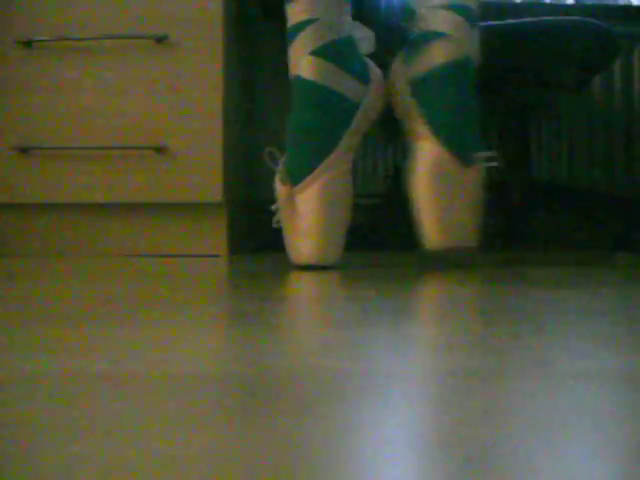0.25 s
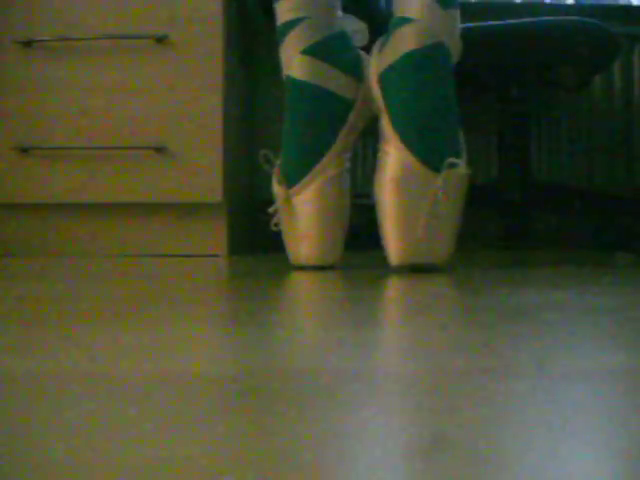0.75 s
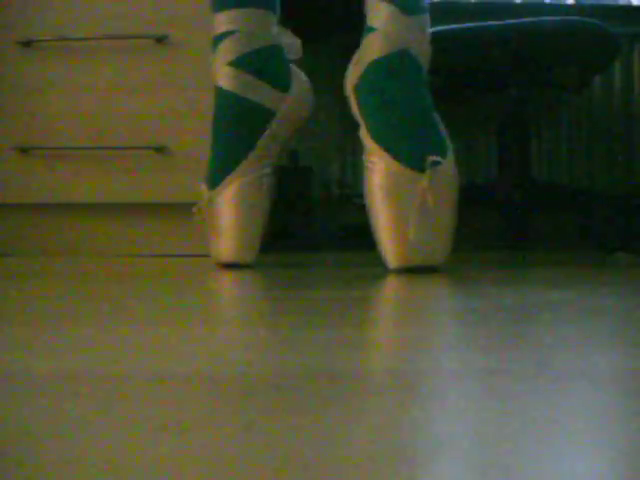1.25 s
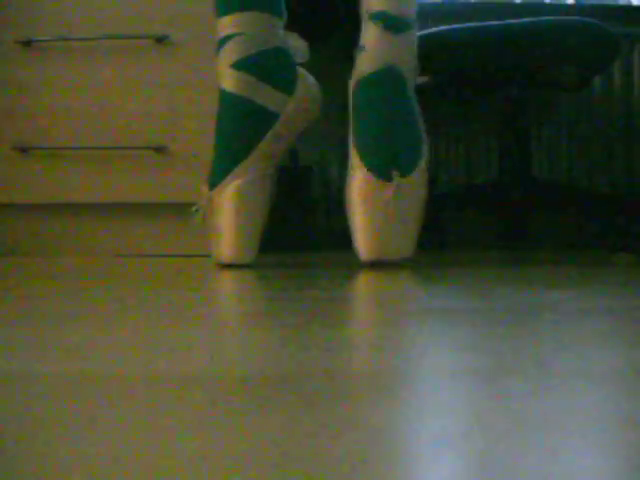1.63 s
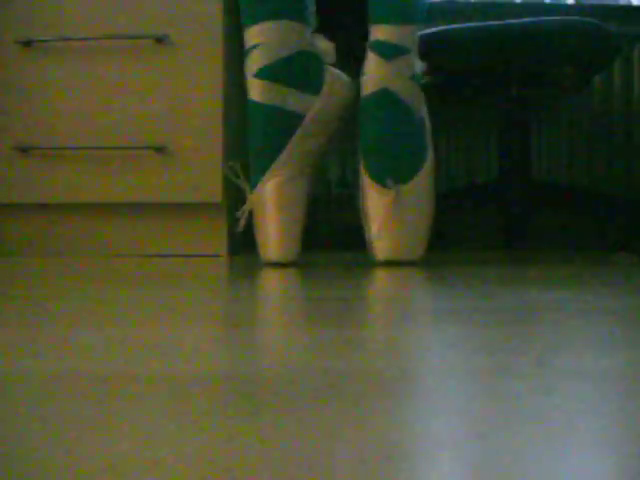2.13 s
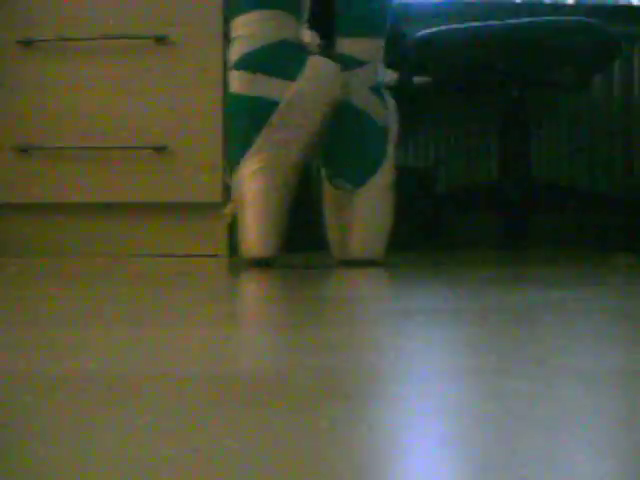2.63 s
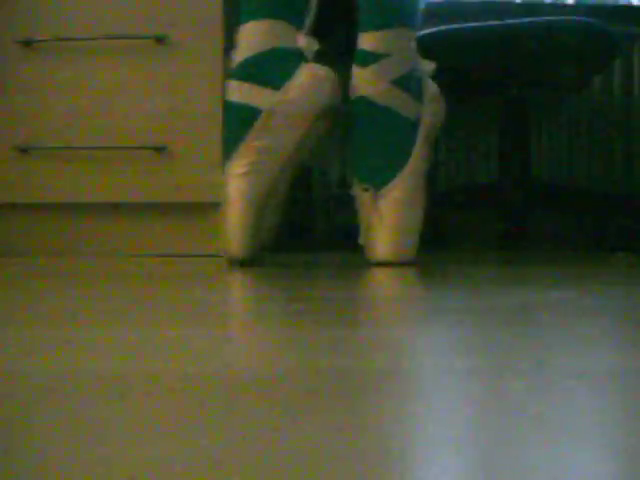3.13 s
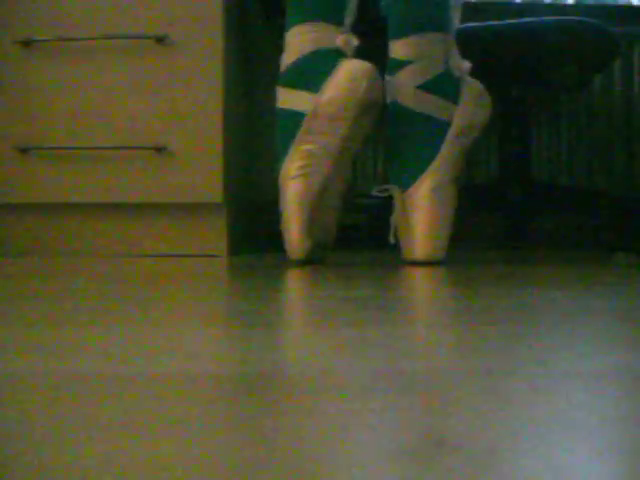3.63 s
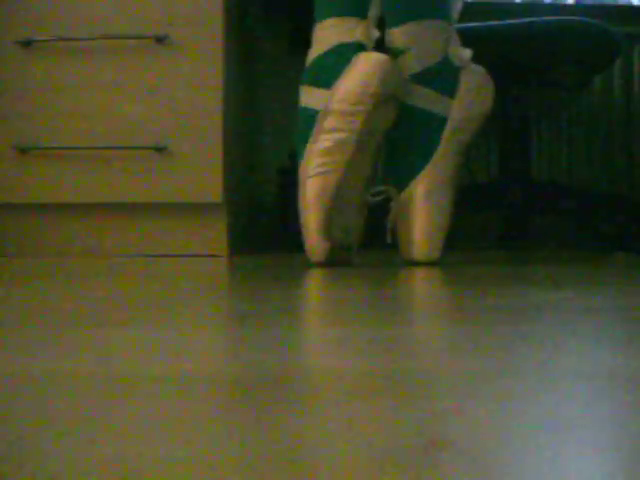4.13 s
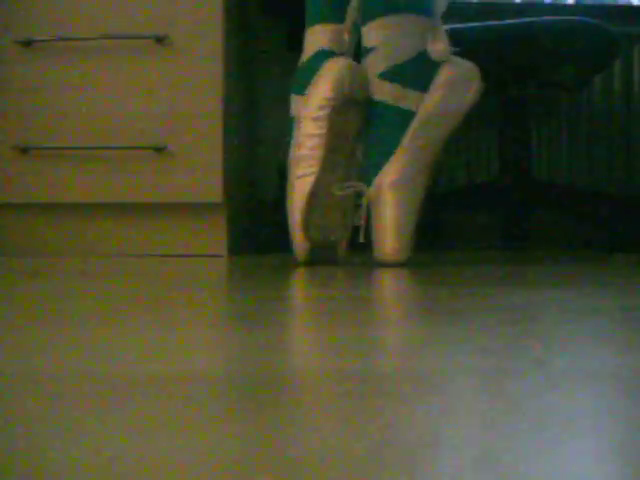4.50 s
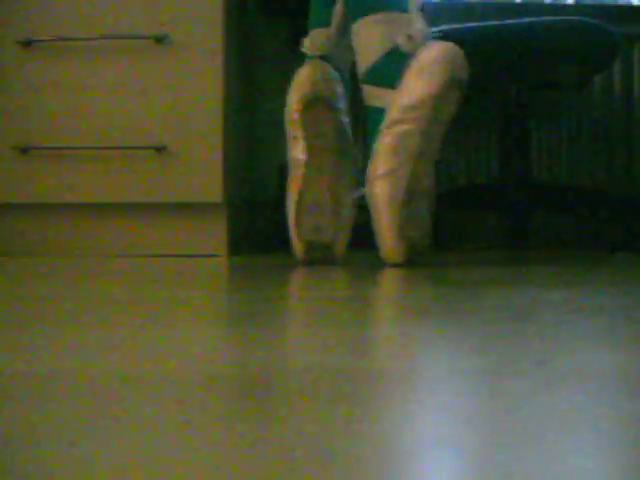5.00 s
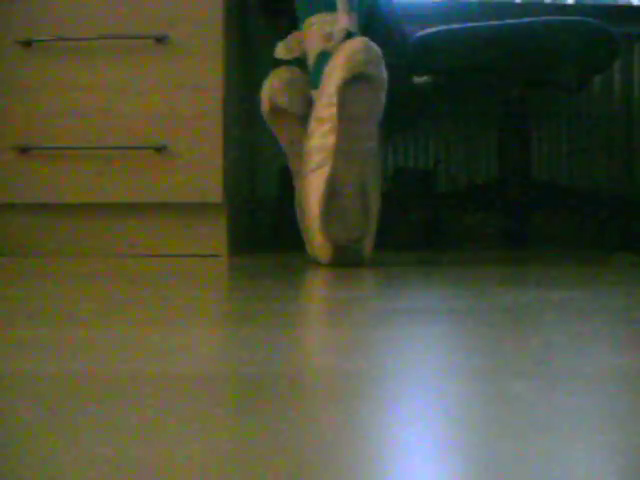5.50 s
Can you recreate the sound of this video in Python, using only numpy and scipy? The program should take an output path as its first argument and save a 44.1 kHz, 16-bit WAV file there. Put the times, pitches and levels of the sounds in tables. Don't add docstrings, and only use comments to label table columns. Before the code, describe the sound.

A coarse low electrical buzz runs throughout while stiff shoe tips tap and clonk on wood close by, with faint satin rubs between.

```python
import sys
import numpy as np
from scipy import signal
from scipy.fft import rfft, irfft, next_fast_len
from scipy.io import wavfile
from scipy.ndimage import map_coordinates

SR = 44100
rng = np.random.default_rng(int(sys.argv[2]) if len(sys.argv) > 2 else 0)


def attenuation_scalar(level_db):
    decades = np.asarray(level_db, float) / 20
    return 10 ** decades


def store_wav(level_fs):
    pcm = np.round(np.clip(np.atleast_2d(level_fs), -1, 1) * 32767)
    wavfile.write(sys.argv[1], SR, pcm.T.astype(np.int16))


N = 254016

# (time [s], blow level [dB], toe box pitch [Hz], floor thud level [dB], crack level [dB])
TOE_BLOWS = [(.621, 1, 221, -2, -19), (1.188, 4, 404, -6.5, -15), (1.6254, 4.5, 325.3, -6.5, -18.5),
             (1.871, 4.5, 601.4, -11.5, -22.5), (2.051, -11, 240, -11, -35), (2.086, -2, 464, -4, -24.5),
             (2.285, -3, 231, -1.5, -25.5), (2.510, 10, 585, -10, -21), (2.717, 6, 639.5, -13.5, -27.5),
             (3.196, 6.5, 685.6, -12, -20), (3.4228, -6.5, 327.4, 0.5, -35.5), (3.63, 7.5, 743, -15.5, -25),
             (3.944, -11, 765, -20.5, -10), (4.044, 13.5, 625, -9, -19.5), (4.256, -3, 267.5, -3.5, -30),
             (4.448, 2, 578, -7, -35.5), (4.711, 7, 501.3, -4, -13.5), (4.908, 12, 594, -12.5, -25),
             (5.180, -3, 290, 1.5, -19.5)]
# (frequency [Hz], density [dB per Hz])
SATIN_SPECTRUM = [(600, -21), (1300, -7.5), (2000, 6.5), (2700, 5.5), (3400, 3.5), (4200, -30)]


def unit(x):
    return x / np.sqrt(np.mean(x ** 2) + 1e-20)


def along(points, hz):
    f, v = np.transpose(points)
    return np.interp(np.log(hz + 1), np.log(f + 1), v)


def noise(spectrum, n):
    m = next_fast_len(n)
    white = rfft(rng.standard_normal(m))
    shape = attenuation_scalar(along(spectrum, np.fft.rfftfreq(m, 1 / SR)))
    return unit(irfft(white * shape, m)[:n])


def wobble(rate):
    knots = rng.standard_normal(int(N * rate / SR) + 4)
    return map_coordinates(knots, [np.arange(N) * rate / SR])


def add(track, s, sound):
    part = track[round(s * SR):][:len(sound)]
    part += sound[:len(part)]


def hiss():
    # (frequency [Hz], density [dB per Hz])
    hiss_spectrum = [(20, -17.5), (60, -5.5), (110, -9.5), (200, -14.5), (300, -5.5), (420, -10), (520, -5),
                     (700, -12), (880, -10), (1300, -18), (1930, -28), (2570, -23.5), (3440, -32.5),
                     (4300, -34.5)]
    t = np.arange(N) / SR
    high_whine = attenuation_scalar(-43.0) * np.sin(2 * np.pi * 2498 * t + 1.2 * wobble(2))
    low_whine = attenuation_scalar(-37.5) * np.sin(2 * np.pi * 1182 * t + 1.4 * wobble(8))
    return attenuation_scalar(-21 + 0.94 * wobble(13)) * noise(hiss_spectrum, N) + high_whine + low_whine


def bump(width_ms):
    ms = np.arange(SR // 20) * 1000 / SR
    x = ms / (2 * width_ms)
    return (x * np.exp(1 - x)) ** 2


def spikes(times, sizes, width_ms, rebound):
    train = np.bincount(np.round(times * SR).astype(int), sizes, N + SR)[:N]
    pulse = bump(width_ms) - rebound * bump(1.12)
    return signal.fftconvolve(train, pulse)[:N]


def buzz():
    # (delay [ms], size [ratio], width [ms], rebound [share])
    switchings = [
        (.42, -.77, .36, .36),
        (18.1, .56, .33, .36),
        (23.1, .25, .33, .2),
        (29.55, -.3, .16, 0),
        (29.8, .2, .4, .45),
    ]
    buzz_hz = 24.5858
    t = np.arange(N) / SR
    starts = np.arange(int(N / SR * buzz_hz) + 1) / buzz_hz
    steady = np.zeros(N)
    for ms, size, width_ms, rebound in switchings:
        sizes = size * attenuation_scalar(rng.normal(0, 1.5, len(starts)))
        steady += spikes(starts + ms / 1000, sizes, width_ms, rebound)
    ripple = attenuation_scalar(-22.5 - 0.2 * t) * np.cos(4 * np.pi * buzz_hz * (t - 0.006))
    when, side, chance = rng.random((520, 3)).T
    stray_sizes = np.sign(side - 0.4) * attenuation_scalar(-3 * np.log(chance + 0.05))
    stray = spikes(when * N / SR, stray_sizes, 0.19, 0.15)
    return attenuation_scalar(0.9) * (steady + ripple) + attenuation_scalar(-10) * stray


def satin_rub():
    # (start [s], swell [s], release [s], peak level [dB])
    strokes = [(.02, 0.018, 0.078, -35), (0.401, .14, 0.11, -31), (0.979, .16, .02, -41.5),
               (2.16, 0.055, 0.088, -34.5), (3.041, .14, 0.013, -34), (3.943, 0.0069, 0.096, -24.5),
               (4.475, 0.0099, 0.12, -29), (5.21, .03, .06, -32), (5.301, .02, 0.054, -29.5),
               (5.48, 0.036, .05, -34), (5.66, 0.027, 0.11, -24.5)]
    range_db = 14.5
    out, u = np.zeros(N), np.arange(SR // 2) / SR
    for s, swell_s, release_s, peak_db in strokes:
        away = np.where(u < swell_s, 1 - u / swell_s, (u - swell_s) / release_s)
        fade = np.clip(u / 0.005, 0, 1) * (away <= 1)
        grain = attenuation_scalar(0.99 * wobble(130)[:len(u)])
        rub = unit(grain * noise(SATIN_SPECTRUM, len(u)))
        add(out, s, attenuation_scalar(peak_db - range_db * away) * fade * rub)
    return out


def sole_ticks():
    # (time [s], peak level [dB], centre frequency [Hz], decay by 60 dB [s])
    touches = [(.302, -17.5, 800, 0.034), (.871, -20, 1540, 0.032), (1.373, -8.5, 1510, .04),
               (1.376, -13, 2360, 0.036), (1.376, -13, 3620, 0.029), (1.413, -3, 826, 0.035),
               (1.601, -17, 1790, 0.032), (1.745, -12.5, 1910, 0.053), (2.193, -4, 820, 0.039),
               (2.277, -21, 708, 0.079), (3.091, -6.5, 800, 0.04), (3.76, -10, 2690, 0.029),
               (3.9444, 7.5, 811, .035), (3.964, -5, 815, .05), (4.529, -15, 2520, 0.038),
               (5.101, -11, 1170, 0.037)]
    out, t = np.zeros(N), np.arange(SR // 4) / SR
    for s, db, hz, t60 in touches:
        band = [(hz / 2, -24), (hz, 0), (hz * 1.6, -14), (hz * 4, -26)]
        click = noise(band, len(t)) + 1.4 * np.sin(2 * np.pi * hz * t)
        add(out, s, attenuation_scalar(db - 10 - 60 * t / t60) * click)
    return out


def room_answer(n, box_hz):
    # (frequency [Hz], density [dB per Hz])
    body_spectrum = [(60, -19.5), (150, -4.5), (300, -4.5), (450, -2), (700, -5), (900, -4), (1200, -24),
                     (2000, -16.5), (4200, -45)]
    # (frequency [Hz], decay by 60 dB [s])
    room_decay = [(100, 0.25), (300, 0.32), (700, 0.31), (1200, 0.29), (2000, 0.14), (4000, 0.3)]
    hz, t, z = signal.stft(noise(body_spectrum, n), SR, nperseg=256)
    dull = 1 / (1 + (hz / (1.81 * box_hz)) ** 3)
    decay = attenuation_scalar(-60 * t / along(room_decay, hz)[:, None])
    return signal.istft(z * dull[:, None] * decay, SR, nperseg=256)[1][:n]


def ring(modes, t, near_hz):
    out = np.zeros(len(t))
    for hz, level, t60 in modes:
        mode_db = level + rng.normal(0, 3.45) - 5 * np.log2(hz / near_hz) ** 2
        phase = 2 * np.pi * hz * (1 + rng.normal(0, 0.012)) * t + rng.normal(0, 1.15)
        out += attenuation_scalar(mode_db - 60 * t / t60) * np.sin(phase)
    return out


def knocks():
    # (frequency [Hz], level [dB], decay by 60 dB [s])
    board_modes = [(154.1, 4.5, 0.22), (229.6, -17.5, 0.75), (289.9, 1, 0.13), (317.7, -7.5, .35)]
    # (frequency [Hz], level [dB], decay by 60 dB [s])
    panel_modes = [(398, 0, .38), (447, -3, .4), (515, -5, .35), (580, -2, .35), (668, 0, .4),
                   (695, -2, .4), (750, -1, .37), (795, -4, .35), (850, -9, .25)]
    # (frequency [Hz], density [dB per Hz])
    boom_spectrum = [(40, -28.5), (90, 4.5), (160, -0.5), (300, 6.5), (450, -10), (900, -46)]
    out, t = np.zeros(N), np.arange(SR // 2) / SR
    swell = 1 - np.exp(-t / 0.0013)
    sag = 2.25 * (1 - np.exp(-t / 0.002))
    for s, db, box_hz, thud_db, crack_db in TOE_BLOWS:
        box = attenuation_scalar(2.5 - 60 * t / 0.076) * np.sin(2 * np.pi * box_hz * t + sag)
        tail = attenuation_scalar(-2) * room_answer(len(t), box_hz) + attenuation_scalar(-12.5) * ring(panel_modes, t, box_hz)
        boom = attenuation_scalar(-6.5 - 60 * t / 0.33) * noise(boom_spectrum, len(t))
        thud = ring(board_modes, t, 210) + boom
        crack_decay = attenuation_scalar(-60 * t / 0.05) + attenuation_scalar(9.5 - 60 * t / 0.0014)
        crack = crack_decay * noise(SATIN_SPECTRUM, len(t))
        floor = swell * (tail + attenuation_scalar(thud_db) * thud)
        add(out, s, attenuation_scalar(db) * (box + floor + attenuation_scalar(crack_db) * crack))
    return out


def scene():
    return (hiss() + buzz() + satin_rub() + sole_ticks() + knocks())[None]


def gain_control():
    threshold_db, knee_db, slope = 0.87, 5.5, 1.583
    duck_s, recover_s = 0.095, 0.2
    s, blow_db = np.transpose(TOE_BLOWS)[:2, :, None]
    age = np.maximum(np.arange(N) / SR - s, 0)
    dip_db = slope * knee_db * np.logaddexp(0, (blow_db - threshold_db) / knee_db)
    course = (1 - np.exp(-age / duck_s)) * np.exp(-age / recover_s)
    return attenuation_scalar(-np.sum(dip_db * course, axis=0))


def roll_off(x):
    return signal.sosfilt(signal.butter(12, 16400, fs=SR, output="sos"), x)


def record(dry):
    full_scale = 0.708
    high_pass = signal.butter(1, 22, "high", fs=SR, output="sos")
    coupled = signal.sosfilt(high_pass, dry * gain_control())
    taps = signal.firwin(441 * 32 + 1, 1 / 441, window=("kaiser", 9))
    samples = signal.resample_poly(coupled, 80, 441, axis=1, window=taps)
    samples = np.clip(samples, -full_scale, full_scale)
    wide = signal.resample_poly(samples, 441, 80, axis=1, window=taps)[:, :N]
    return roll_off(np.clip(wide, -full_scale, full_scale))


dry = scene()
out = record(dry)
store_wav(out)
```